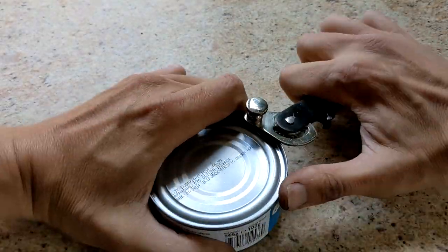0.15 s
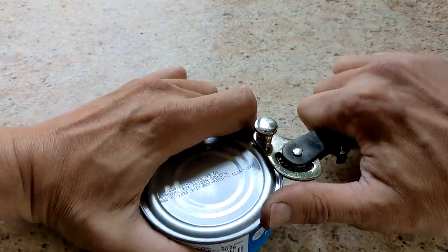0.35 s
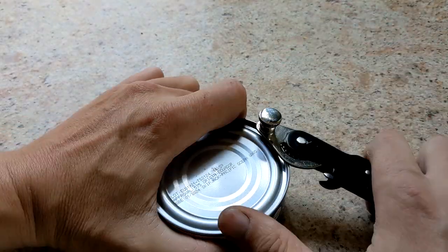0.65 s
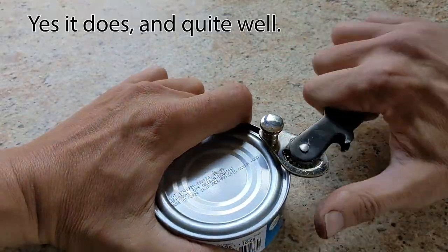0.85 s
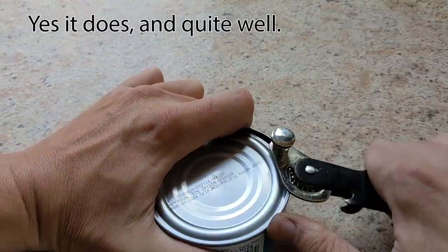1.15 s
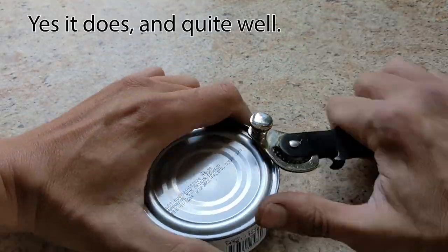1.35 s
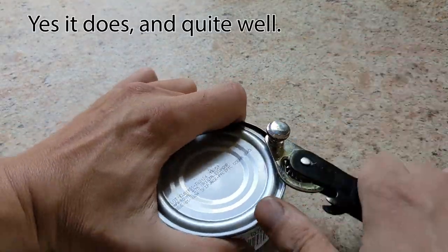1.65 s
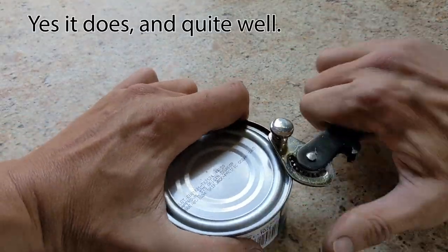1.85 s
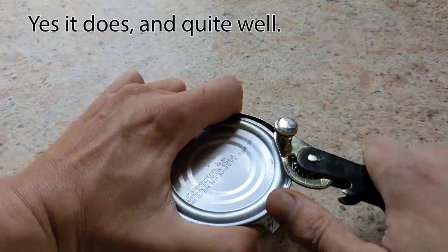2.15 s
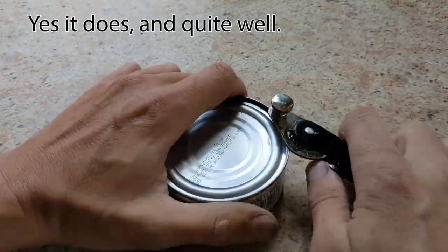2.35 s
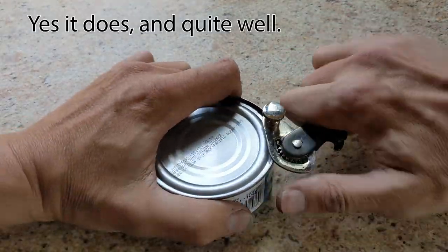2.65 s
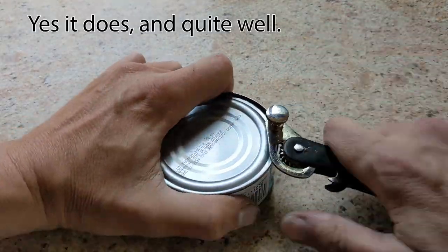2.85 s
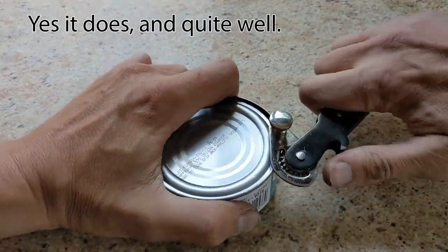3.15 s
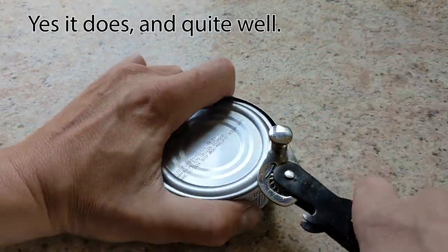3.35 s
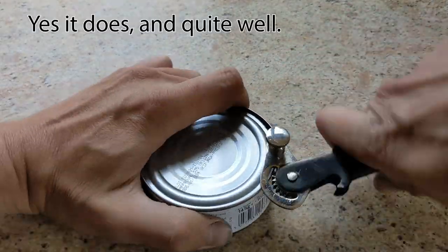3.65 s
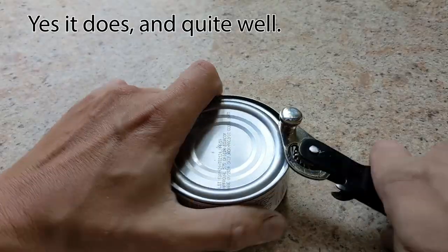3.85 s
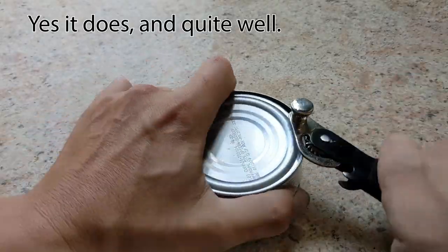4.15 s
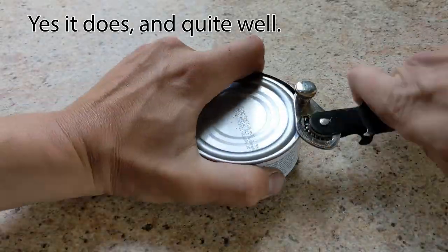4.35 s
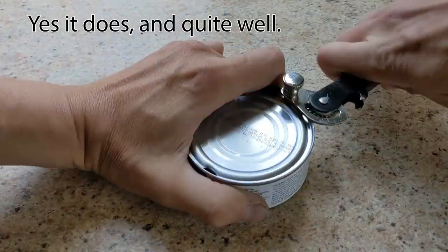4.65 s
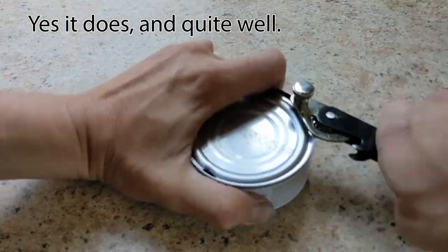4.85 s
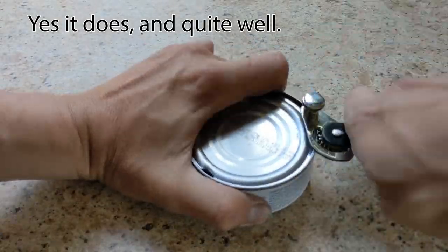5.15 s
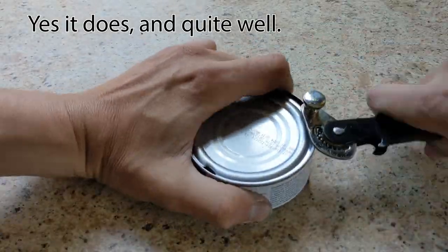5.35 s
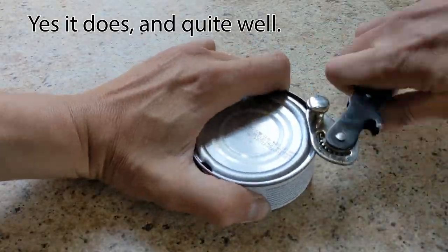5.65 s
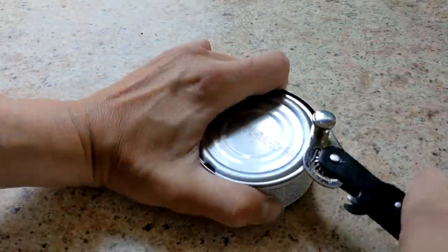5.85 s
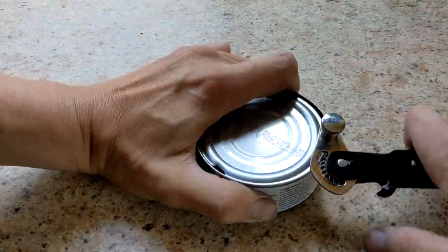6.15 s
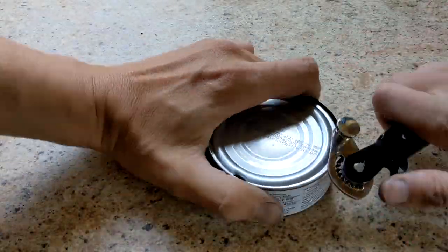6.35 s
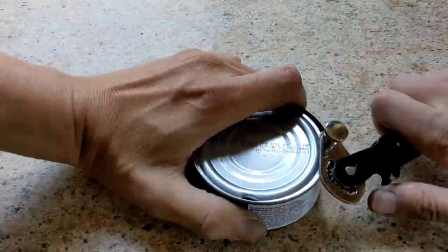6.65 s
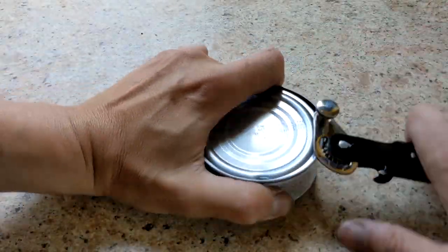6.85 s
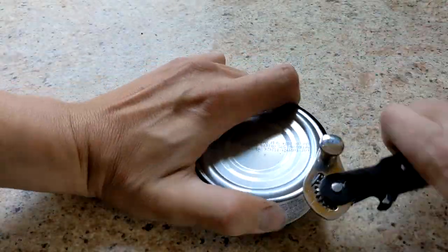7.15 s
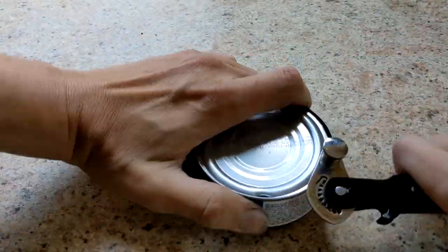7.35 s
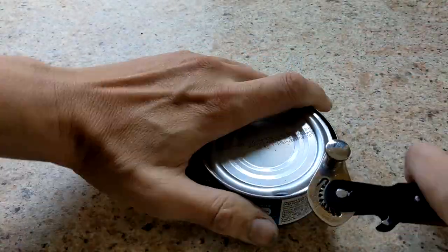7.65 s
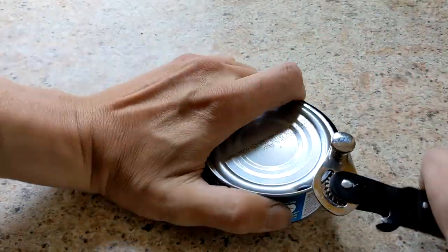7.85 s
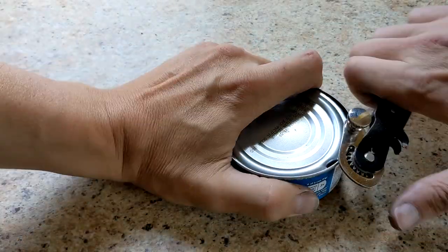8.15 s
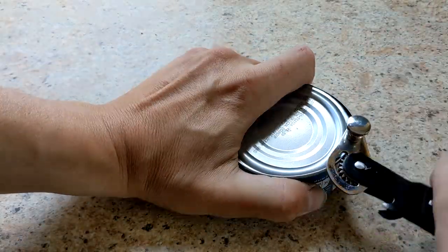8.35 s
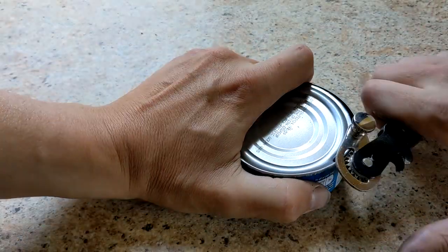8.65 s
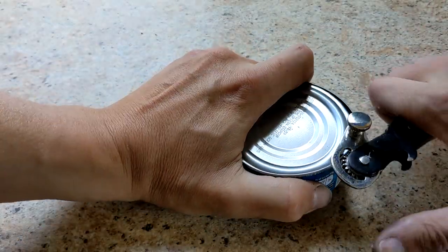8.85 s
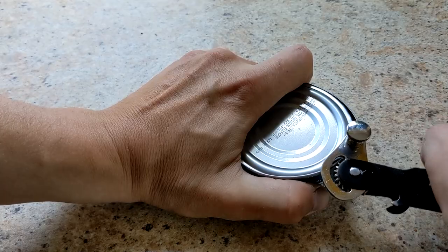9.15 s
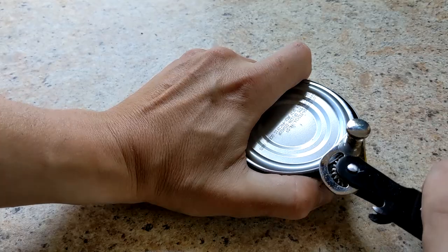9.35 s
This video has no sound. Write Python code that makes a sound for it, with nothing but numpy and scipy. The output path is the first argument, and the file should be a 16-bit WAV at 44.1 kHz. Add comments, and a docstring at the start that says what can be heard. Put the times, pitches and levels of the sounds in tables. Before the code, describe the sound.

A lever can opener ratchets quickly around a tin, sped-up clicks, metallic crunches and small thumps, ending in slower, deeper knocks and a slide on stone.

```python
"""Sharp clicks, crunches and dull thumps: a lever can opener ratchets round a tin on a stone counter, close by.
It runs at triple speed, so all rings three times higher and shorter, until the last second is at true speed.
Teeth click on the rim and the blade tears the tin with rough slips; both ring the modes of the tin.
The full can thumps and at last slides over the counter; a small kitchen answers, over a soft hush."""
import sys
import numpy as np
from scipy import signal
from scipy.fft import rfft, irfft
from scipy.io import wavfile
from scipy.ndimage import map_coordinates

SR = 44100
rng = np.random.default_rng(int(sys.argv[2]) if len(sys.argv) > 2 else 0)


def dump(signal):
    """Clip the signal to [-1, 1] and save it as 16-bit WAV at the path in sys.argv[1]."""
    limited = np.clip(np.atleast_2d(signal).T, -1, 1)
    pcm = np.round(limited * 32767).astype(np.int16)
    wavfile.write(sys.argv[1], SR, pcm)


N = 418509  # length in samples
FAST = 3  # speed factor of the first part
SLOW_FROM_S = 8.52  # true speed from here on

# All levels of the sources hold before the microphone and the kitchen.
# Teeth on the rim, at triple speed: (time [s], level of the ring's peak [dB], tick level above the ring [dB])
TOOTH_CLICKS = [(0.413, -39, -10), (0.448, -47, -3), (0.4609, -41.5, -3), (0.5097, -23.5, -5),
                (0.5492, -23, -12), (0.568, -26, 0.5), (0.64, -42, 12.5), (0.6618, -41, -8),
                (0.6808, -38, 3.5), (0.824, -50, 8), (0.944, -41.5, -7), (0.9632, -41, 2),
                (1.215, -37, 3.5), (1.34, -33, -6), (1.3676, -16, -41), (1.415, -26, -14), (1.605, -37, -1),
                (1.6374, -25, 3), (1.893, -41, 4), (1.957, -44.5, 0), (1.9879, -20.5, -6), (2.03, -36, 7),
                (2.2686, -34, -8), (2.3018, -21, -17), (2.366, -29, -3), (2.473, -36, -1), (2.54, -27, 2),
                (2.567, -7, -3.5), (2.6713, -40, -36), (2.7905, -33.5, -6), (2.877, -40.5, 0),
                (2.9323, -19.5, -8.5), (3.0845, -29.5, -13), (3.1158, -28, 7), (3.255, -31.5, -9),
                (3.3695, -30.5, -7), (3.429, -34, -10), (3.5105, -39, -15), (3.619, -39, -35),
                (3.8097, -30.5, -1), (3.8754, -30.5, 1), (4.0751, -35.5, -26), (4.1155, -40, -23),
                (4.2058, -29, -5), (4.3139, -23, -34), (4.3996, -25, -18), (4.433, -30, -10),
                (4.4537, -40.5, 6), (4.5172, -24, -10), (4.541, -22.5, -24), (4.593, -22.5, -19),
                (4.6039, -23.5, 1.5), (4.668, -41, -28), (4.857, -32, -3.5), (4.921, -37, -3),
                (4.942, -29.5, 3.5), (5.094, -37.5, -25), (5.2, -38.5, 6.5), (5.3216, -29.5, -16),
                (5.461, -37, -25), (6.103, -40, 3.5), (6.3021, -25.5, -4), (6.3548, -28.5, -24),
                (6.568, -29, -22), (6.6249, -33, -18), (6.7135, -60.5, 30), (6.76, -23, -14),
                (6.7758, -30.5, 6.5), (6.984, -40, -12), (7.021, -33.5, -4), (7.134, -27.5, 0),
                (7.4037, -24, -4), (7.584, -41, -9), (7.6567, -26, -4.5), (7.7942, -23, -7.5),
                (7.9898, -21, -7), (8.205, -36.5, 6.5), (8.334, -15, -2), (8.461, -38, 3.5),
                (8.478, -37.5, -4)]


def clicks():
    """Each tooth knocks the rim: a quickly damped ring of the tin with a short hard tick on top."""
    s, db, tick_db = np.transpose(TOOTH_CLICKS)
    table = zip(s, db, lid(s, spread_oct=0.057), tick_db)
    tin = body(0.94, damp=0.25, reach_oct=0.51, drift=0.03, vary_db=3.0)
    return blows(table, tin, chatter_db=-26.5, chatter_s=0.012, crack_db=10.5,
                 tick_hz=(5000, 19000), tick_s=0.011, push_s=0.00086, crack_s=0.0017)


# Blade tearing through the tin, at triple speed:
# (time of the top [s], rms level of each edge's slips at the top [dB], brightest pitch [Hz], swell [s], fade [s])
BLADE_CRUNCHES = [(0.021, -54.5, 2720, 0.061, 0.062), (0.101, -52, 2160, 0.043, 0.016),
                  (0.358, -57.5, 2000, 0.0066, 0.021), (0.456, -47, 2100, 0.0091, 0.034),
                  (0.683, -44.5, 2920, 0.0089, 0.011), (0.911, -52.5, 1530, .025, 0.015),
                  (0.97, -46, 1560, 0.02, 0.019), (1.032, -43, 1810, 0.025, 0.025),
                  (1.078, -58, 2950, 0.025, 0.031), (1.31, -56, 2270, 0.022, 0.011),
                  (1.419, -52, 2530, 0.11, 0.0035), (1.522, -49, 1860, 0.018, 0.018),
                  (1.903, -51.5, 2500, 0.0059, 0.017), (2.061, -44, 2650, 0.0082, 0.0082),
                  (2.234, -52, 2580, 0.061, 0.013), (2.426, -47.5, 2330, 0.072, 0.019),
                  (2.68, -47, 1580, 0.0028, 0.024), (2.935, -47.5, 3020, 0.033, 0.024),
                  (3.26, -47.5, 2140, 0.019, 0.0069), (3.431, -51, 2140, 0.0071, 0.045),
                  (3.519, -41, 2770, 0.013, 0.038), (3.583, -48, 2550, 0.041, 0.013),
                  (3.749, -52, 2770, 0.069, 0.13), (3.914, -52.5, 2410, 0.01, 0.049),
                  (4.122, -46, 1160, 0.011, 0.0056), (4.334, -32.5, 2700, 0.022, 0.017),
                  (4.46, -45.5, 3940, 0.025, 0.0084), (4.549, -36.5, 3000, 0.017, 0.051),
                  (4.605, -25.5, 3800, 0.0058, 0.013), (4.666, -47, 2400, 0.0069, 0.013),
                  (4.862, -40, 1580, 0.016, 0.015), (5.028, -51.5, 880, 0.0083, 0.017),
                  (5.096, -49.5, 2600, 0.021, 0.016), (5.43, -50, 1320, 0.0086, 0.0063),
                  (5.473, -44.5, 3370, 0.016, 0.026), (5.678, -52.5, 1430, 0.014, 0.033),
                  (5.748, -49, 1940, 0.031, 0.021), (5.655, -56, 3370, 0.0035, 0.009),
                  (5.795, -48, 3660, 0.012, 0.025), (5.85, -41, 2840, 0.043, 0.015),
                  (5.94, -47.5, 2720, 0.021, 0.024), (6.192, -50.5, 3200, 0.027, 0.013),
                  (6.25, -47.5, 2940, 0.049, 0.021), (6.301, -55.5, 3310, 0.024, 0.047),
                  (6.426, -44.5, 2520, 0.024, 0.015), (6.468, -51.5, 3300, 0.0089, 0.024),
                  (6.565, -42.5, 3500, 0.074, 0.018), (6.658, -40, 2440, 0.038, 0.016),
                  (6.779, -39.5, 3130, 0.022, 0.032), (6.933, -44.5, 2980, 0.057, 0.015),
                  (7.039, -43, 2970, 0.0055, 0.025), (7.25, -59, 3030, 0.16, 0.037),
                  (7.447, -47.5, 2020, 0.014, 0.0061), (7.849, -45, 2960, 0.034, 0.057),
                  (8.115, -54.5, 2610, 0.012, 0.018), (8.231, -52, 1550, 0.0073, 0.01)]
RASP_DB, RASP_DB_PER_OCT = -13.5, 10  # rasp re the top of a 2500 Hz crunch; brighter crunches rasp more
SHAKE_DB, SHAKE_HZ = -10.5, 437  # the shake of the can re its crunch, and its brightest pitch


def tears():
    """The blade slips through the metal, ringing the tin; each crunch also shakes the full can."""
    bright = [(*row, RASP_DB + RASP_DB_PER_OCT * np.log2(row[2] / 2500)) for row in BLADE_CRUNCHES]
    shakes = [(s, db + SHAKE_DB, SHAKE_HZ, swell, fade, -40) for s, db, hz, swell, fade in BLADE_CRUNCHES]
    tin = body(0.94, damp=0.32, reach_oct=0.54, drift=0.025, vary_db=5.0)
    return (crunches(bright, tin, rasp_hz=4900, per_s=2400, spread_db=2.0)
            + crunches(shakes, can_base(), rasp_hz=5000, per_s=900, spread_db=1.0))


# Can on the counter, at triple speed: (time [s], level of the ring's peak [dB], brightest pitch [Hz])
CAN_THUMPS = [(0.06, -48, 275), (0.362, -47, 481), (0.416, -41.5, 285), (0.454, -44, 292),
              (0.513, -36, 276), (0.703, -47.5, 290), (0.964, -43, 523), (1.016, -43.5, 495),
              (1.217, -36.5, 313), (1.297, -47.5, 475), (1.368, -37, 306), (1.608, -40.5, 279),
              (1.667, -33, 380), (2.06, -38, 262), (2.203, -37, 230), (2.303, -29, 550), (2.498, -48, 285),
              (2.566, -20, 1520), (2.569, -30, 276), (2.923, -42, 283), (3.114, -36, 880),
              (3.253, -39, 312), (3.369, -38, 537), (3.431, -37.5, 426), (3.735, -33.5, 267),
              (3.815, -41.5, 500), (4.057, -38.5, 266), (4.314, -36, 1020), (4.406, -38, 526),
              (4.558, -45.5, 275), (4.603, -31.5, 870), (4.862, -34.5, 303), (5.678, -43.5, 550),
              (6.135, -44, 980), (6.181, -43, 880), (6.247, -44.5, 404), (6.293, -40.5, 515),
              (6.39, -42, 405), (6.423, -35.5, 447), (6.525, -39, 440), (6.583, -30.5, 491),
              (6.639, -45, 260), (6.775, -36, 526), (6.927, -33, 300), (7.139, -43.5, 280),
              (7.442, -43, 280), (7.587, -38, 230), (7.861, -34, 250), (8.141, -38.5, 304),
              (8.228, -44, 536)]


def thumps():
    """The full can lands on the stone: a softer push than a click, so the low modes ring and the tick is faint."""
    table = [(s, db, hz, -50) for s, db, hz in CAN_THUMPS]
    return blows(table, can_base(), chatter_db=-25.0, chatter_s=0.012, crack_db=-13.0,
                 tick_hz=(5000, 19000), tick_s=0.0037, push_s=0.0018, crack_s=0.0058)


def grinding():
    """Small scrapes, bumps and ticks under the louder events follow the pressure on the blade."""
    rim = body(0.9, damp=0.42, reach_oct=0.52, drift=0.045, vary_db=5.5)

    def lid_pitch(s):
        return lid(s, spread_oct=0.4)

    def can_pitch(s):
        return 380 * 2 ** (0.62 * rng.standard_normal(len(s)))

    scrapes = scattered(count=220, lift_db=1.5, pitch=lid_pitch, size_s=0.012, spread_db=2.0, rasp_db=-14.5)
    bumps = scattered(count=110, lift_db=5.0, pitch=can_pitch, size_s=0.018, spread_db=1.5, rasp_db=-34.0)
    small = scattered(count=90, lift_db=11.5, pitch=lid_pitch, size_s=1, spread_db=2.5, rasp_db=-7.5)
    ticks = [(s, db, hz, tick_db) for s, db, hz, swell, fade, tick_db in small]  # ticks need no swell or fade
    return (blows(ticks, rim, chatter_db=-26, chatter_s=0.004, crack_db=2.0,
                  tick_hz=(4500, 19000), tick_s=0.0036, push_s=0.00035, crack_s=0.003)
            + crunches(scrapes, rim, rasp_hz=4950, per_s=1800, spread_db=2.5)
            + crunches(bumps, can_base(), rasp_hz=5000, per_s=800, spread_db=1.5))


# Pressure on the blade, as a base level for the small events: (time [s], level [dB])
BLADE_PRESSURE = [(0.0, -67), (1.26, -69), (2.01, -72.5), (2.44, -51), (3.06, -70.5), (3.72, -55.5),
                  (4.15, -57), (4.46, -57), (4.82, -64), (6.05, -63.5), (6.43, -54.5), (6.9, -64),
                  (8.28, -59.5), (8.52, -61)]


def scattered(count, lift_db, pitch, size_s, spread_db, rasp_db):
    """Rows of small crunches, unevenly spaced, louder under more pressure."""
    s = (np.arange(count) + rng.random(count)) * SLOW_FROM_S / count
    u, w = rng.standard_normal((2, count))
    db = np.interp(s, *np.transpose(BLADE_PRESSURE)) + lift_db + spread_db * u
    swell = size_s * undb(4.25 * w)
    fade = 2 * size_s * undb(3.2 * w)
    return zip(s, db, pitch(s), swell, fade, rasp_db + 5 * w)  # longer ones rasp more


# Knocks at true speed: (time [s], level of the ring's peak [dB], brightest pitch [Hz])
SLOW_KNOCKS = [(8.522, -49.5, 930), (8.738, -44.5, 816), (8.988, -31.5, 1284), (9.052, -34, 1193),
               (9.11, -22.5, 1390), (9.111, -30, 367), (9.187, -39.5, 970), (9.217, -39, 1270),
               (9.297, -34.5, 860)]


def knocks():
    """Knocks of the can at true speed ring the same tin, three times lower and longer."""
    table = [(*row, -12) for row in SLOW_KNOCKS]
    tin = body(FAST, damp=0.14, reach_oct=0.2, drift=0.005, vary_db=2.5)
    return blows(table, tin, chatter_db=-32.5, chatter_s=0.03, crack_db=7.0,
                 tick_hz=(4100, 6500), tick_s=0.0067, push_s=0.001, crack_s=0.0071)


def sliding():
    """Rough friction on the stone makes a low boom and a rattle in the tin, and a hiss from the stone."""
    force = grit(N, 1500, 0.85)
    boom = rubbed(band(force, 120, 350), 150, 600, damp=0.32)
    rattle = rubbed(force, 600, 4500, damp=0.75)
    return (shoves(column=2, fall_db_per_s=187) * boom
            + shoves(column=3, fall_db_per_s=223) * rattle
            + shoves(column=4, fall_db_per_s=197.5) * stone_hiss())


# Shoves of the can over the stone, at true speed:
# (start time [s], time held [s], boom level [dB], rattle level [dB], hiss level [dB])
CAN_SHOVES = [(8.521, 0.14, -62.5, -73, -66), (8.64, 0.14, -61, -67, -66.5),
              (8.919, 0.048, -58, -70, -84.5), (8.99, 0.16, -87, -61, -63), (9.11, 0.1, -45, -49.5, -74),
              (9.287, 0.02, -51.5, -46, -61.5)]
SHOVE_ATTACK_S = 0.022


def shoves(column, fall_db_per_s):
    """Gain over time of one voice of the shoves: attack, hold, then a fall after the hand lets go."""
    t = np.arange(N) / SR
    gain = np.zeros(N)
    for row in CAN_SHOVES:
        start, held = row[:2]
        attack = np.clip((t - start) / SHOVE_ATTACK_S, 0, 1)
        gain += attack * undb(row[column] - fall_db_per_s * np.maximum(t - start - held, 0))
    return gain


# Stone under the rim: (frequency [Hz], width of each of two equal filters [Hz], relative level [dB])
STONE_BANDS = [(2100, 210, -2), (4470, 550, 2), (8200, 11000, 10.5)]


def stone_hiss():
    """Noise through broad bands, each filtered twice, for the hiss of rubbed stone."""
    noise = rng.standard_normal(N)
    return unit(sum(undb(db) * unit(band(band(noise, hz, width), hz, width))
                    for hz, width, db in STONE_BANDS))


# Modes of can and counter at triple speed:
# (frequency [Hz], relative level [dB], time to fall 60 dB before damping [s])
TIN_MODES = [(183, -4, 0.18), (283.2, 1, 0.12), (477.5, -3, 0.18), (720, -26.5, 0.013), (930.3, 1.5, 0.2),
             (1007, 8, 0.099), (1266, -6.5, 0.29), (1392, 2, 0.054), (1553, -4, 0.11), (1915, -2.5, 0.041),
             (2304, -4.5, 0.076), (2403, -6, 0.015), (2642, -0.5, 0.04), (2873, -0.5, 0.041),
             (3180, 0.5, 0.035), (3275, -0.5, 0.024), (3620, 1.5, 0.035), (4160, -4.5, 0.033),
             (4770, -1, 0.021), (5110, -2, 0.061), (5370, -4.5, 0.0066)]
MODE_HZ, RING_DB, RING_S = np.transpose(TIN_MODES)


def body(slow, damp, reach_oct, drift, vary_db):
    """A function that gives the ring of the modes nearest a bright spot; grip and cut shift it each time."""
    n = np.arange(int(0.05 * slow * SR))
    decay_per_s = np.log(1000) / (damp * RING_S * slow)
    rings = np.exp(np.outer(2j * np.pi * MODE_HZ / slow - decay_per_s, n / SR)).imag

    def ring(hz):
        octaves_off = np.log2(MODE_HZ / slow / hz)
        vary = vary_db * rng.standard_normal(len(MODE_HZ))
        share = RING_DB - 6 * (octaves_off / reach_oct) ** 2 + vary
        sides = rng.choice([-1, 1], len(MODE_HZ))  # each spot pushes some modes in and others out
        stretch = 1 + drift * rng.standard_normal()
        return np.interp(n * stretch, n, sides * undb(share) @ rings)
    return ring


def can_base():
    """The lower body of the full can at triple speed: its modes barely shift from blow to blow."""
    return body(1, damp=0.57, reach_oct=0.47, drift=0.012, vary_db=2.0)


def rubbed(force, lo_hz, hi_hz, damp):
    """A rough force rings the modes at true speed; the limits pick them by their triple-speed pitch."""
    return unit(sum(undb(db) * unit(band(force, hz / FAST, 0.68 / (t60 * damp * FAST)))
                    for hz, db, t60 in TIN_MODES if lo_hz < hz < hi_hz))


# The lid rings brighter as the cut frees it: pitch at the start, its climb, its ceiling
LID_HZ, LID_HZ_PER_S, LID_TOP_HZ = 2400, 180, 3360


def lid(s, spread_oct):
    """Brightest pitch of the lid at each time; the grip scatters it."""
    pitch = np.minimum(LID_HZ + LID_HZ_PER_S * s, LID_TOP_HZ)
    return pitch * 2 ** (spread_oct * rng.standard_normal(len(s)))


def blows(table, ring, chatter_db, chatter_s, crack_db, tick_hz, tick_s, push_s, crack_s):
    """Each blow and its chatter ring the tin, shaped by the contact; a short hard tick lies on top."""
    out = np.zeros(2 * N)
    edge = signal.butter(2, tick_hz, "band", fs=SR, output="sos")
    for s, db, hz, tick_db in table:
        modes = ring(hz)
        t = np.arange(len(modes)) / SR
        contact = undb(chatter_db) * rng.standard_normal(len(t)) ** 3 * np.exp(-t / chatter_s)
        contact[0] = 1  # the blow itself
        push = 1 - np.exp(-(t / push_s) ** 2)
        touch = push * (1 + undb(crack_db) * np.exp(-(t / crack_s) ** 2))  # louder while the parts touch
        rung = touch * signal.fftconvolve(contact, modes)[:len(t)]
        snap = signal.sosfilt(edge, rng.standard_normal(len(t)) * np.exp(-t / tick_s))
        colour_hz = rng.uniform(tick_hz[0], 0.81 * tick_hz[1])  # each tick has its own colour
        tick = touch * (0.31 * snap + band(snap, colour_hz, 0.51 * tick_hz[0]))
        k = int(s * SR)
        out[k:k + len(t)] += undb(db) * (rung / abs(rung).max() + undb(tick_db) * tick / abs(tick).max())
    return out[:N]


# The blade catches and lets go: spread of the lumps, their rate
CATCH_DB, CATCHES_PER_S = 4.5, 160.8


def crunches(table, ring, rasp_hz, per_s, spread_db):
    """Dense slips that swell and fade; they ring the tin and rasp above it."""
    before, after = 2800, 3200  # samples either side of the top
    out = np.zeros(2 * N)
    t = np.arange(-before, after) / SR
    for s, db, hz, swell, fade, rasp_db in table:
        shape = undb(db - 18.3 * (t / np.where(t < 0, swell, fade)) ** 2)
        rung = 0
        for edge_of_blade in range(2):  # each edge catches in its own lumps and rings its own modes
            lumps = np.interp((t - t[0]) * CATCHES_PER_S, np.arange(len(t)), rng.standard_normal(len(t)))
            slips = unit(undb(CATCH_DB * lumps) * grit(len(t), per_s, spread_db))
            modes = ring(hz)[:after]
            modes = modes / np.sqrt(2 * np.sum(modes ** 2))
            rung = rung + signal.fftconvolve(shape * slips, modes)[:len(t)]
        rasp = unit(treble(slips + rng.standard_normal(len(t)), rasp_hz))  # slips of the second edge
        k = int(s * SR)
        out[k:k + len(t)] += rung + undb(rasp_db) * shape * rasp
    return out[before:before + N]


def grit(count, per_s, spread_db):
    """Stick-slip: sparse slips, most small and a few large."""
    hit = rng.random(count) < per_s / SR
    size = rng.standard_normal(count) * undb(spread_db * rng.exponential(size=count))
    return unit(1e-9 + hit * size)


def ports(x, slow, lead_s=0.00005, sway_s=0.00002):
    """Two microphone openings: the left is nearer and gets more bass and treble; the moving hand sways both."""
    x = treble(treble(x, 55 * FAST / slow), 50 * FAST / slow)  # the microphone's bass cut moves with the speed
    late = map_coordinates(x, [np.arange(N) - slow * SR * (lead_s + sway_s * walk(9))], order=2)
    sway = undb(1.36 * walk(4.8))
    bass = undb(-8) * band(x, 600 / slow, 2400 / slow)
    top = 0.51 * band(x, 10000 / slow, 6000 / slow)
    return np.array([sway * (x + bass + top), late / sway]) + kitchen(x, slow)


def kitchen(x, slow, room_db=-10, room_t60_s=0.089):
    """The small room answers with a fading noise tail, different at each port and longer at true speed."""
    t = np.arange(int(0.28 * slow * SR)) / SR
    tail = treble(rng.standard_normal((2, len(t))) * 1000 ** (-t / room_t60_s / slow), 700 / slow)
    tail = unit(signal.lfilter([1], [1, -0.3], tail)) / np.sqrt(len(t))  # slightly duller
    return undb(room_db) * signal.fftconvolve(x[None], tail, axes=1)[:, :N]


# Colour of the kitchen hush at triple speed: (frequency [Hz], relative level [dB])
HUSH_COLOUR = [(40, -40), (386, -9.5), (485, -5), (578, -20), (933, 2.5), (1750, -10), (2900, -11.5),
               (4560, -21), (13800, -28), (16500, -36.5), (36000, -31.5)]
AIR_DB = -68.5  # middle rms level of the hush at triple speed


def air():
    """Coloured noise for the kitchen hush, three times lower once the speed drops."""
    hz, db = np.transpose(HUSH_COLOUR)
    f = np.fft.rfftfreq(N, 1 / SR) + 1
    white = rfft(rng.standard_normal(N) + 0.5 * rng.standard_normal((2, N)))  # shared, plus some per side
    fast, slow = (irfft(white * undb(np.interp(np.log(f * k), np.log(hz), db)), N) for k in (1, FAST))
    gain = undb(AIR_DB + 2.0 * walk(3.2)) / np.sqrt(np.mean(fast ** 2))
    return gain * np.where(np.arange(N) < SLOW_FROM_S * SR, fast, undb(5.0) * slow)


def undb(db):
    """Gain of a level in dB."""
    return 10 ** (np.asarray(db) / 20)


def unit(x):
    """Scaled to rms 1."""
    return x / np.sqrt(np.mean(x ** 2))


def band(x, hz, width):
    """Two-pole resonance, gain 1 at the centre."""
    return signal.lfilter(*signal.iirpeak(hz, hz / width, fs=SR), x)


def treble(x, hz):
    """What lies above a pitch."""
    return signal.sosfilt(signal.butter(2, hz, "high", fs=SR, output="sos"), x)


def walk(rate):
    """Random levels joined by straight lines, rate of them a second."""
    count = int(N * rate / SR) + 2
    return np.interp(np.arange(N) * rate / SR, np.arange(count), rng.standard_normal(count))


def scene():
    """Both speeds, each through the two ports, over the hush; at true speed the top is duller."""
    opener = clicks() + tears() + thumps() + grinding()
    fast = ports(opener, 1.0) * (np.arange(N) < SLOW_FROM_S * SR)
    slow = ports(knocks() + sliding(), FAST, lead_s=0.000012, sway_s=0)
    slow = signal.sosfilt(signal.butter(6, 12500, fs=SR, output="sos"), slow)
    return fast + slow + air()


def record(dry):
    """The phone cuts the top above 16500 Hz."""
    return signal.sosfilt(signal.ellip(10, 0.2, 80, 16500, fs=SR, output="sos"), dry)


dry = scene()
out = record(dry)
dump(out)
```